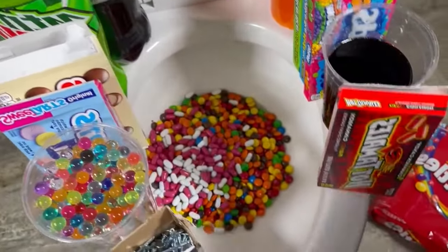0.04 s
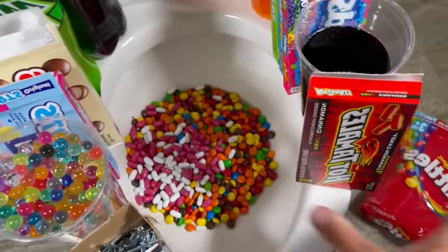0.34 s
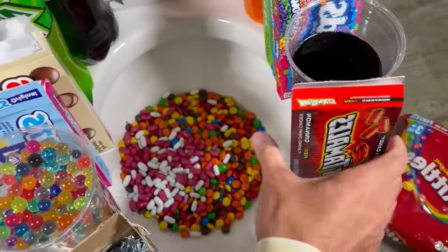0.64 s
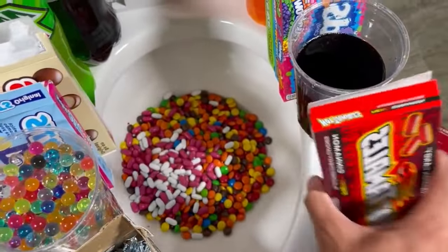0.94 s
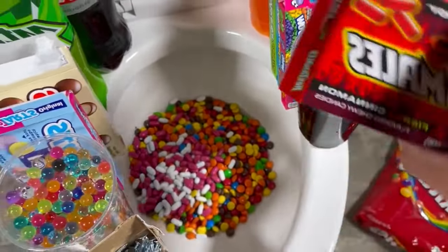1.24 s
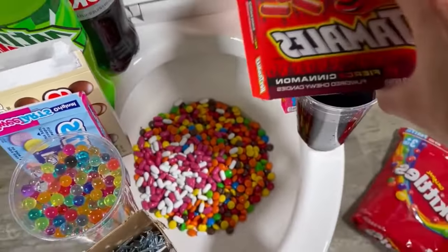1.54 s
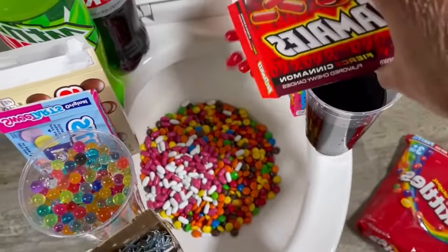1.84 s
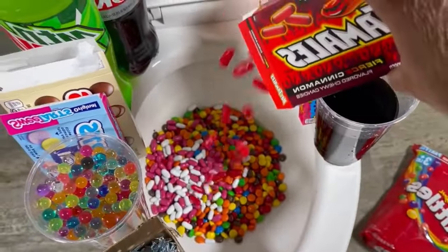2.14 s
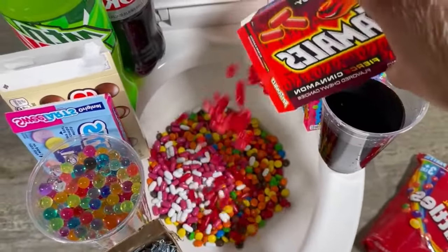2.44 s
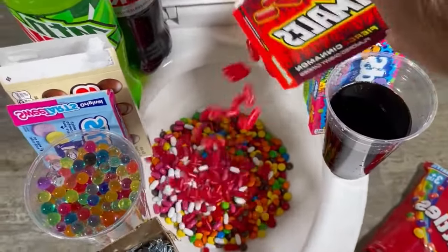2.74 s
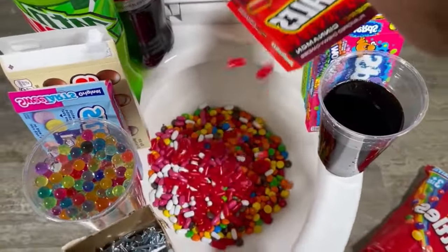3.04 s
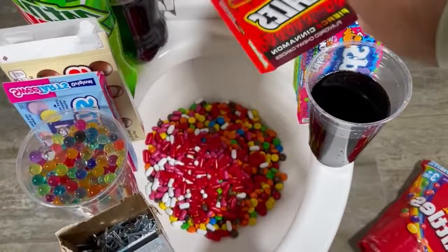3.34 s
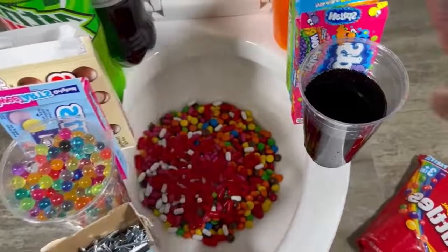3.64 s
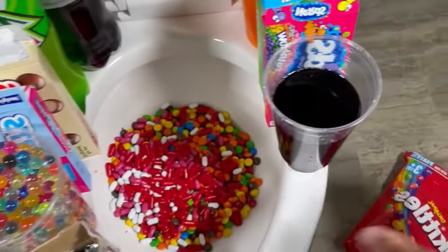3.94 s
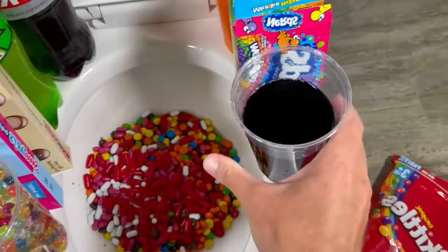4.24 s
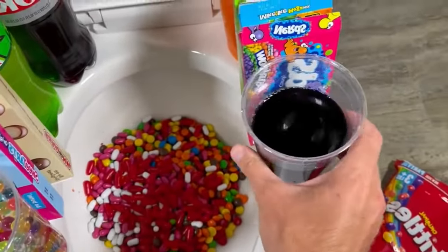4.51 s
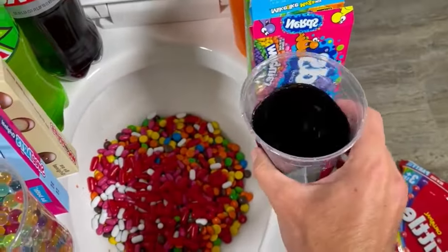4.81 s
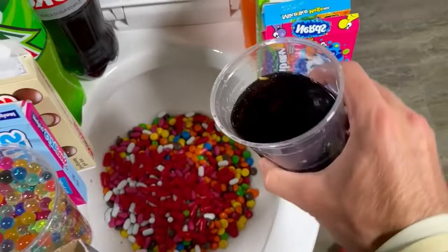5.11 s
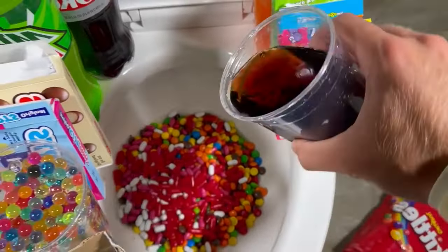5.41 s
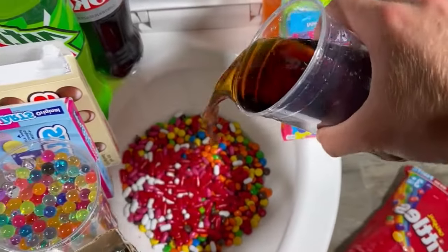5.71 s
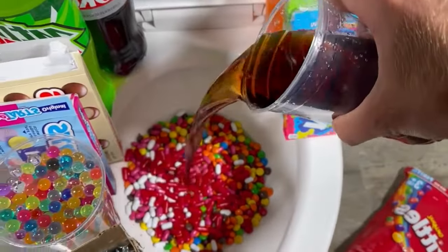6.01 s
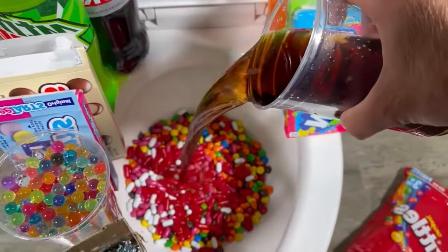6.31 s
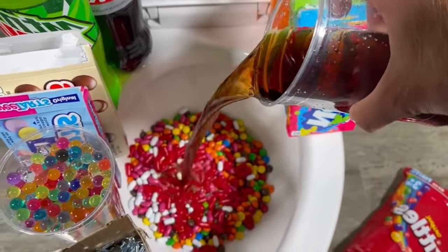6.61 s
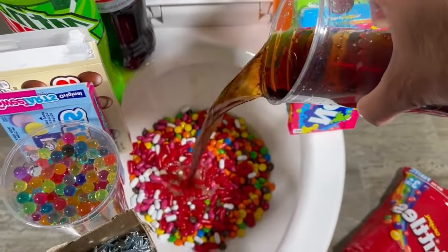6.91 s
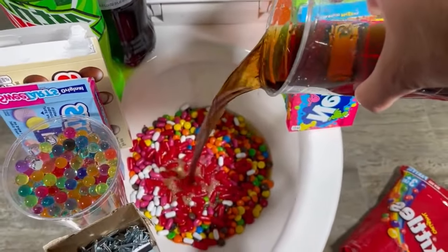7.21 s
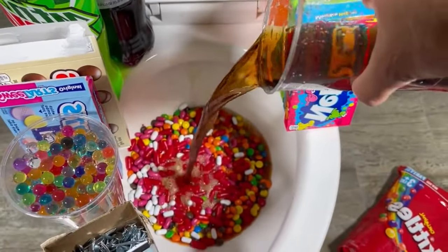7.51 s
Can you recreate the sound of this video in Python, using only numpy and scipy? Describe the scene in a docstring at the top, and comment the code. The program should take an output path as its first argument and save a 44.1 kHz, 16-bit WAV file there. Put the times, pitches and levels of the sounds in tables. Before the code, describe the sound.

Heard from close above a porcelain toilet bowl in a small tiled room, a few hollow bumps sound over a faint electric hum. Hard candies slide and rattle inside a card box and spill onto more candies with a crisp, clicking clatter. After a short lull come light knocks and crackles from a plastic cup against the rim, and finally a pour of soda that splashes and fizzes brightly on the pile.

```python
"""First come a few hollow knocks over a low hum: a hand bumps a card box of hard candies on the rim of
a porcelain toilet. The box tips, and the candies rattle down the card, then clatter onto a pile of
candies in the bowl, each with a tiny snap. A plastic cup bumps the rim, and soda splashes on the pile
and fizzes with tiny ringing bubbles. A small tiled room echoes; the microphone is close above the bowl."""
import sys
import numpy as np
from scipy import signal
from scipy.fft import rfft, irfft, next_fast_len
from scipy.io import wavfile
from scipy.ndimage import uniform_filter1d, map_coordinates

SR = 44100
rng = np.random.default_rng(int(sys.argv[2]) if len(sys.argv) > 2 else 0)


def int16_out(signal):
    """Quantize to a 16-bit WAV file."""
    q = np.round(np.clip(np.atleast_2d(signal).T, -1, 1) * 32767)
    wavfile.write(sys.argv[1], SR, q.astype(np.int16))


N = 337806


def amp(db):
    """Turn decibels into a number to multiply a sound by."""
    return 10 ** (np.asarray(db) / 20)


def unit(x):
    """Scale a sound to an average strength (rms) of 1."""
    return x / np.sqrt(np.mean(x ** 2) + 1e-20)


def along(points, hz):
    """Read between the (f/Hz, value) rows of a table, on a musical pitch scale."""
    f, v = np.transpose(points)
    return np.interp(np.log(hz + 1), np.log(f + 1), v)


def level(rows):
    """Join (t/s, level/dB) rows into a volume curve, silent before and after."""
    rows = np.asarray(rows)
    return amp(np.interp(np.arange(N) / SR, rows[:, 0], rows[:, 1], left=-150, right=-150))


def swell(s, length, rise_s, fall_s):
    """A volume curve that rises at time s, holds, then dies away."""
    t = np.maximum(np.arange(N) / SR - s, 0)
    return (1 - np.exp(-t / rise_s)) * np.exp(-np.maximum(t - length, 0) / fall_s)


def wobble(rate):
    """A smooth curve through `rate` random values a second."""
    return map_coordinates(rng.standard_normal(int(N * rate / SR) + 4), [np.arange(N) * rate / SR])


def add(track, s, sound):
    """Mix a stereo sound in at time s."""
    start = int(s * SR)
    track[:, start:start + sound.shape[-1]] += sound[..., :N - start]


def sides(db):
    """Two volumes that make the left side db louder than the right."""
    return amp(np.array([[db], [-db]]) / 2)


def noise(size, spread):
    """Stereo noise; more spread sounds wider."""
    mid, side = rng.standard_normal((2, size))
    return unit(np.array([mid + spread * side, mid - spread * side]))


def ticks(rows, t60):
    """A burst of noise for each (t/s, level/dB) row; t60 is the seconds it takes to fade by 60 dB."""
    track, t = np.zeros((2, N)), np.arange(SR // 20) / SR
    for s, db in rows:
        add(track, s, noise(len(t), spread=0.46) * amp(db - 60 * t / t60))
    return track


def grains(rate, low_hz, high_hz, cycles, size_db, rise=0):
    """Tiny fading pings, `rate` a second; size_db makes them uneven and rise bends their pitch up."""
    count = int(rate * N / SR)
    when, pitch, size, pan, lag = rng.random((5, count, 1))
    hz = low_hz + (high_hz - low_hz) * pitch
    i = np.arange(min(int(4 * cycles * SR / low_hz), 2000))
    age = hz * i / SR / cycles
    shape = amp(-size_db * np.log(size + .01)) * np.exp(-age)
    phase = 2 * np.pi * cycles * age * (1 + rise * np.minimum(age, 2) / 2)
    where = ((when * N).astype(int) + i).ravel()
    ears = [shape * (1 + way * (pan - .5)) * np.sin(phase + way * (lag - .5)) for way in (1, -1)]
    return unit(np.array([np.bincount(where, ear.ravel(), N)[:N] for ear in ears]))


def colour(x, tone):
    """Shape a sound with an (f/Hz, level/dB) tone table; plain white noise keeps its overall power."""
    size = 16384
    cepstrum = irfft(np.log(amp(along(tone, np.fft.rfftfreq(size, 1 / SR)))))
    cepstrum[1:size // 2] *= 2  # folded so the filter rings only after a hit, never before
    cepstrum[size // 2 + 1:] = 0
    pulse = irfft(np.exp(rfft(cepstrum)))
    return signal.fftconvolve(x, pulse[None] / np.linalg.norm(pulse), axes=1)[:, :N]


def patchy(x, depth_db):
    """Pitches grow louder and softer at random, as when the pile shifts."""
    z = signal.stft(x, nperseg=512)[2]
    patches = uniform_filter1d(rng.standard_normal(z.shape[1:]), size=7, axis=0)
    patches = uniform_filter1d(patches, size=16, axis=1)
    return unit(signal.istft(z * amp(depth_db * unit(patches)), nperseg=512)[1][:, :N])


def glide(x, path, sharpness):
    """Bring out one moving pitch that follows (t/s, f/Hz) rows."""
    hz, t, z = signal.stft(x, SR, nperseg=1024)
    ratio = (hz[:, None] + 1) / np.interp(t, *np.transpose(path))
    gain = 1 / (1 + 1j * sharpness * (ratio - 1 / ratio)) ** 2
    return unit(signal.istft(z * gain, SR, nperseg=1024)[1][:, :N])


# Levels in the tables are relative: the code that plays them sets the final volume.
HUM_NOTES = [(59.6, -66), (119, -78.5), (238, -78)]  # the notes of the electric hum: f/Hz, level/dB
RUMBLE_TONE = [(20, -31.5), (32, -22), (43, 0.5), (62, 7.5), (85, -7.5), (150, -7.5), (300, -19),
               (600, -26), (1500, -42), (3000, -66.5)]  # the deep tone of the rumble: f/Hz, level/dB
RUMBLE_LEVEL = [(0.0, -60), (4.3, -57), (6.8, -56), (7.27, -50.5), (7.66, -47.5)]  # the rumble slowly growing: t/s, level/dB
HISS_TONE = [(300, 2.5), (1500, -1), (3000, -1), (6000, -9), (9000, -3.5), (11200, 2), (13000, -19)]  # the tone of the faint hiss: f/Hz, level/dB
def background():
    """Mains electricity hums over a low rumble and a faint hiss."""
    t = np.arange(N) / SR
    hum = sum(amp(db) * np.sqrt(2) * np.sin(2 * np.pi * hz * t + .25 * wobble(1)) for hz, db in HUM_NOTES)
    rumble = colour(noise(N, spread=0.57), RUMBLE_TONE) * level(RUMBLE_LEVEL) * amp(1)
    hiss = colour(noise(N, spread=0.74), HISS_TONE) * amp(-84)
    return hum + rumble + hiss


ROOM_FADE = [(100, 0.45), (400, 0.39), (1200, 0.49), (4000, 0.61), (9000, 0.55), (14000, 0.28)]  # how long the tiles echo at each pitch: f/Hz, t60/s
def room(x, echo_db):
    """Add the tiled room's echo, made afresh three times a second because the sources move."""
    out, block = x.copy(), SR // 3
    for start in range(0, N, block):
        part = x[:, start:start + block].mean(axis=0)
        if np.abs(part).max() > 1e-5:
            hz, t, z = signal.stft(noise(SR // 2, spread=0.65), SR, nperseg=256)
            fade = amp(-60 * t / along(ROOM_FADE, hz)[:, None]) * (1 - np.exp(-t / 0.002))
            tail = signal.istft(z * fade, SR, nperseg=256)[1]
            echo = signal.fftconvolve(part[None], tail / np.linalg.norm(tail[0]), axes=1)
            add(out, start / SR, amp(echo_db) * echo)
    return out


CARD_TONE = [(150, -16), (500, -6), (800, 2.5), (1250, 1), (1600, -1), (2200, 1), (3000, -5), (4200, -10),
             (6500, -12.5), (8500, -7), (11200, -10.5), (12500, -42), (14000, -59)]  # the tone of tapped card: f/Hz, level/dB
BOX_AIR_PITCH = [(1.401, 570), (1.648, 537), (1.851, 470), (2.1, 350), (2.5, 237), (3.0, 223)]  # the air in the box, deeper as it empties: t/s, f/Hz
BRUSH_TONE = [(100, -18), (300, 0), (800, -9), (2000, -1.5), (4000, -8.5), (6500, -8.5), (8500, -4.5),
              (11200, 0), (13000, -35.5)]  # the tone of a hand rubbing card: f/Hz, level/dB
SLIDE_LEVEL = [(1.05, -73.5), (1.3, -58.5), (1.45, -42), (1.72, -37.5), (1.96, -43.5), (2.55, -34),
               (3.0, -48), (3.25, -70), (3.7, -70)]  # candies sliding down the card: t/s, level/dB
HAND_STROKES = [(0.0, 0.011, -73), (0.086, .07, -78), (3.688, 0.16, -63.5), (3.8, 0.055, -61),
                (3.901, .16, -59.5), (5.565, .05, -82)]  # the hand brushing the box: t/s, length/s, level/dB
BOX_TAPS = [(1.179, -44.5, -57), (1.306, -42.5, -54), (1.415, -27.5, -50.5), (1.435, -23.5, -29),
            (1.461, -22.5, -48), (1.5, -23, -45), (1.572, -28, -32.5), (1.641, -23.5, -39.5),
            (1.679, -22, -35), (1.734, -22, -53.5), (1.814, -30.5, -28), (1.849, -26.5, -30),
            (2.034, -21, -41.5), (2.081, -25.5, -36.5), (3.808, -48.5, -59.5), (4.062, -46.5, -65)]  # single taps on the box: t/s, card level/dB, air level/dB
def box():
    """Candies tumble against the card and sound the air inside; the hand brushes it before and after."""
    tumbling = grains(rate=1000, low_hz=547, high_hz=11330, cycles=0.82, size_db=2.5)
    tumbling += 2.5 * noise(N, spread=0.59)
    rattle = patchy(colour(tumbling, CARD_TONE), depth_db=1.2) * amp(2.4 * wobble(60))
    low_taps = grains(rate=700, low_hz=222, high_hz=1264, cycles=1, size_db=3.5)
    hollow = glide(low_taps, BOX_AIR_PITCH, sharpness=0.76)
    sliding = (rattle * amp(-0.5) + hollow * amp(-8.5)) * level(SLIDE_LEVEL)
    brush = patchy(colour(noise(N, spread=0.54), BRUSH_TONE), depth_db=5) * amp(3.7 * wobble(45))
    strokes = sum(amp(db) * swell(s, length, rise_s=.005, fall_s=.025) for s, length, db in HAND_STROKES)
    taps = np.array(BOX_TAPS)
    card_taps = colour(ticks(taps[:, [0, 1]], t60=0.04), CARD_TONE) * amp(-7)
    air_taps = glide(ticks(taps[:, [0, 2]], t60=0.06), BOX_AIR_PITCH, sharpness=1.2) * amp(-57)
    return room(sliding + card_taps + air_taps + brush * strokes, echo_db=-7) * sides(2.6)


def ring(notes, centre_hz, t, db_per_octave, attack_s):
    """A struck thing rings at its own notes; where it is hit favours those near centre_hz."""
    hz, db, t60 = np.transpose(notes)[:, :, None]
    db = db - db_per_octave * np.abs(np.log2(hz / centre_hz))
    strength, skew = rng.standard_normal((2, len(notes), 1))
    phase = 2 * np.pi * (hz * t + rng.random((len(notes), 1)))
    fade = amp(db + 2 * strength - 60 * t / t60) * (1 - np.exp(-t / attack_s))
    pair = np.array([np.sum(fade * np.sin(phase + way * 0.74 * skew), axis=0) for way in (1, -1)])
    return pair / np.abs(pair).max()


# The box, then the cup, bumping the rim; the last three levels are added to the first:
# t/s, level/dB, ring f/Hz, thump level/dB, thump f/Hz, crack level/dB, second touch level/dB
RIM_BUMPS = [(0.149, -55.5, 910, 1, 240, -17, -3), (0.429, -19, 1700, -31.5, 284, -16.5, -7.5),
             (0.441, -14, 853, -19, 148, -17.5, -5.5), (0.692, -7, 900, -32.5, 210.4, -26.5, -4.5),
             (0.823, -17.5, 1060, -30, 253, -26, -6), (4.14, -26, 778, -21, 234, -13.5, -11.5),
             (4.152, -11.5, 800, -25, 220, -16.5, -4), (4.171, -25, 787, -7.5, 105, -13, -7),
             (4.234, -24, 786, -19, 217, -17, -20), (4.32, -27.5, 780, -7.5, 278, -14.5, -5.5),
             (4.404, -30, 856, -5, 215, -24, -16), (4.588, -47.5, 732, -3, 215, -16.5, -7),
             (4.686, -12, 1300, -30.5, 299, -21, -13.5), (4.821, -35, 417, -10.5, 218, -23, -12),
             (4.922, -27.5, 909, -30.5, 261, -20, -0.5), (4.946, -13.5, 925, -23, 206, -23.5, -6)]
def rim_touches(rock_s=.013):
    """Every bump is a first touch and a duller second one as the box or cup rocks."""
    for s, db, ring_hz, thump_db, thump_hz, crack_db, again_db in RIM_BUMPS:
        yield s, db, ring_hz, thump_db, thump_hz, crack_db
        yield s + rock_s, db + again_db, ring_hz * .71, thump_db, thump_hz * .62, crack_db


BOWL_NOTES = [(416, -5, 0.051), (577, -6, 0.048), (724.6, -5, 0.068), (773, 1.5, 0.03), (856, -2, 0.044),
              (945, -10.5, 0.042), (1102, -6.5, 0.053), (1159, -14, 0.1), (1222, -0.5, 0.019),
              (1360, -4, 0.027), (1473, -5, 0.06), (1618, -6, 0.042), (1947, -10.5, .06)]  # the notes of the hollow bowl and its rim: f/Hz, level/dB, t60/s
SEAT_NOTES = [(60, -14, .2), (108, -9.5, 0.2), (132, -5, 0.17), (192.3, -6, 0.17), (227, -1.5, 0.082),
              (270, 0, 0.1)]  # the low notes of the seat: f/Hz, level/dB, t60/s
CRACK_TONE = [(100, -27), (700, 7), (1900, 1.5), (3000, -5), (6000, -12.5), (8600, -10), (11000, -6),
              (12500, -29), (14500, -44.5)]  # the tone of the box or cup crackling: f/Hz, level/dB
def knocks():
    """Each soft bump rings the bowl, thumps the seat and crackles like card or thin plastic."""
    body, cracks, t = np.zeros((2, N)), np.zeros((2, N)), np.arange(SR // 4) / SR
    soft_start = 1 - np.exp(-(t / .002) ** 2)
    for s, db, ring_hz, thump_db, thump_hz, crack_db in rim_touches():
        bowl = ring(BOWL_NOTES, ring_hz, t, db_per_octave=13, attack_s=.0005) * soft_start
        seat = ring(SEAT_NOTES, thump_hz, t, db_per_octave=10.5, attack_s=.00076)
        add(body, s, amp(db) * sides(2.4) * bowl + amp(db + thump_db + 6) * seat)
        burst = noise(len(t), spread=0.49) * amp(-60 * t / 0.058) * soft_start
        add(cracks, s, amp(db + crack_db + 9.5) * sides(1.8) * burst)
    return room(body + colour(cracks, CRACK_TONE), echo_db=-3.5) * sides(1.5)


POUR_SURGES = [(6.07, 3), (6.3, 3.5), (6.5, 3), (6.65, -4.5), (6.74, 4), (6.88, 3.5), (7.12, 2), (7.38, 3),
               (7.5, 0), (7.63, 1.5)]  # the stream swelling and easing as the cup tips: t/s, level/dB
def stream(start_s=5.882, rise_s=.0034, surge_s=.032, soaked_s=6.42, soaking_s=.051):
    """Volume curves for fizz, froth and splash: the flow starts at once, surges and soaks the pile."""
    t = np.arange(N) / SR
    flowing = 1 - np.exp(-np.maximum(t - start_s, 0) / rise_s)
    surge_db = sum(db * np.exp(-.5 * ((t - s) / surge_s) ** 2) for s, db in POUR_SURGES)
    soaked = .5 + .5 * np.tanh((t - soaked_s) / (2 * soaking_s))
    froth_db = -47.5 - 8 * soaked  # the bubbles fade as the pile soaks
    return flowing * amp([-41 + surge_db, froth_db + 0.44 * surge_db, -58 + 0.89 * surge_db])


FIZZ_TONE = [(800, -44), (2200, -20.5), (4600, -12), (6200, -7), (7600, -1), (9200, 0.5), (11000, 6),
             (12200, -4.5), (13500, -15.5), (15500, -50)]  # the bright tone of the fizz: f/Hz, level/dB
FROTH_TONE = [(1000, 2.5), (2200, -17.5), (2900, -0.5), (3500, 3.5), (4400, -5.5), (7000, -23),
              (12000, -41)]  # the tone of bubbles between the candies: f/Hz, level/dB
SPLASH_TONE = [(70, 7), (160, -16.5), (270, 9), (420, -15.5), (580, -4), (900, -4.5), (1200, -4),
               (2200, -3), (4000, -3.5), (8000, -47)]  # the duller tone of the splash: f/Hz, level/dB
FIRST_SPLASH = [(5.883, -64, 2455), (5.91, -56, 2280), (5.98, -54.5, 1570), (6.06, -54.5, 1200),
                (6.2, -79, 1060)]  # the first splash spreading: t/s, level/dB, f/Hz
BIG_DROPS = [(6.0911, -27), (6.2198, -26.5), (6.7595, -26), (6.9656, -23.5), (7.0509, -23.5),
             (7.1292, -19.5)]  # larger drops snapping on the pile: t/s, level/dB
POOL_LEVEL = [(6.0, -73), (7.2, -75), (7.5, -51.5), (7.66, -57)]  # soda gurgling as it pools: t/s, level/dB
def soda():
    """Soda lands with a splash that falls in pitch, then fizzes; bubbles chirp and a pool gurgles."""
    spatter = grains(rate=1500, low_hz=2420, high_hz=14360, cycles=4.1, size_db=-4.5)
    chirps = grains(rate=220, low_hz=3500, high_hz=10000, cycles=16, size_db=2, rise=.07)
    fizz = colour(spatter + .6 * chirps + .3 * noise(N, spread=.5), FIZZ_TONE)
    fizz = patchy(fizz, depth_db=1.8) * amp(1.1 * wobble(25))
    bubbles = grains(rate=1600, low_hz=2595, high_hz=6320, cycles=10.4, size_db=0.9, rise=0.083)
    froth = patchy(colour(bubbles, FROTH_TONE), depth_db=0.3)
    drops = grains(rate=500, low_hz=903, high_hz=2630, cycles=2.9, size_db=5.5, rise=0.135)
    splash = colour(.3 * drops + noise(N, spread=.5), SPLASH_TONE)
    splash = patchy(splash, depth_db=1.6) * amp(1.6 * wobble(14))
    gurgle = grains(rate=200, low_hz=463, high_hz=657, cycles=8.4, size_db=4, rise=0.036)
    first = glide(drops + noise(N, spread=.5), np.array(FIRST_SPLASH)[:, ::2], sharpness=1.65)
    snaps = colour(ticks(BIG_DROPS, t60=0.024), FIZZ_TONE) * amp(-2.5)
    fizz_volume, froth_volume, splash_volume = stream()
    bright = fizz * fizz_volume + froth * froth_volume + snaps
    dull = splash * splash_volume + gurgle * level(POOL_LEVEL) * amp(-6) + first * level(FIRST_SPLASH)
    return room(bright + dull * sides(1.7), echo_db=-5.5) * sides(1.4)


def bowl_echoes(x, t60, echo_db):
    """Add many quick echoes off the curved porcelain."""
    t = np.arange(SR // 16) / SR
    echoes = noise(len(t), spread=0.18) * amp(-60 * t / t60)
    return x + amp(echo_db) * signal.fftconvolve(x, echoes / np.linalg.norm(echoes[0]), axes=1)[:, :N]


FIRST_CANDIES = [(1.8723, -11.5), (1.9026, -22.5), (1.9174, -16), (2.0067, -19.5), (2.1272, -5.5),
                 (2.1779, -8), (2.189, -8), (2.2504, -11.5), (2.264, -13), (2.2944, -9.5), (2.3306, -7),
                 (2.383, -5.5), (2.4256, -7), (2.46, -14.5), (2.5149, -12.5), (2.5295, -6.5),
                 (2.5624, -6.5), (2.587, -11.5), (2.6139, -7.5), (2.6261, -8.5), (2.6733, -8.5),
                 (2.7167, -16), (2.7669, -8.5), (2.7995, -8.5), (2.847, -5.5), (2.9011, -13), (2.9333, -11),
                 (2.9746, -12.5), (3.0125, -13), (3.0597, -10), (3.1164, -11), (3.1879, -11), (3.2621, -8),
                 (3.3229, -10), (3.469, -26.5), (3.487, -29)]  # the first candy of each clump landing: t/s, level/dB
CANDY_FLOW = [(2.12, -44), (2.35, -26), (2.49, -33), (2.62, -23.5), (2.74, -24.5), (2.92, -24.5),
              (3.1, -35), (3.3, -55), (3.551, -75)]  # the flow of candies from the box: t/s, level/dB
def landings(followers, clump_s=.036, bounce_s=.007):
    """List (t/s, level/dB) for each clump: its first candy, one softer bounce and the followers."""
    s, db = np.transpose(FIRST_CANDIES)
    chance = rng.random((len(s), followers + 1))
    lateness = (np.arange(followers) + chance[:, 1:]) / followers
    follow_s = s[:, None] + clump_s * lateness
    follow_db = np.interp(follow_s, *np.transpose(CANDY_FLOW)) + 6.5 * (1 - lateness)  # later is softer
    follow_db += 4.5 * rng.standard_normal(lateness.shape)  # candies differ in size
    again_s = s + bounce_s * (.5 + chance[:, 0])
    first_db = db - 7
    return [*zip(follow_s.ravel(), follow_db.ravel()), *zip(s, first_db), *zip(again_s, first_db - 12)]


CLICK_TONE = [(80, -50.5), (150, -30.5), (260, -40.5), (400, -27), (600, -38), (770, -23.5), (1100, -35.5),
              (1900, -21.5), (3300, -12), (5000, -12), (7000, -7.5), (9000, -2), (10700, 6.5),
              (12000, -5.5), (13500, -17), (15500, -32.5)]  # the bright tone of a candy landing: f/Hz, level/dB
BOOM_TONE = [(80, -10), (150, -7.5), (255, 3), (380, -20.5), (620, -7), (750, 6), (850, -14), (1100, -11),
             (2500, -48.5)]  # the tone of the bowl under the pile: f/Hz, level/dB
def candies():
    """Each candy lands with a snap and its shell rings; others roll and settle, and the bowl booms."""
    hits, t = np.zeros((2, N)), np.arange(SR // 20) / SR
    sharp_start = 1 - np.exp(-t / 0.00059)
    for s, db in landings(followers=4):
        pitch, pan = rng.standard_normal(2)
        snap = noise(len(t), spread=0.16) * amp(-60 * t / 0.016)
        shell = .7 * np.sin(2 * np.pi * 8800 * np.exp(.15 * pitch) * t) * amp(-60 * t / .006)
        echoes = 0.5 * noise(len(t), spread=0.25) * amp(-60 * t / 0.043)
        add(hits, s, amp(db + 5) * sides(1.2 + 2 * pan) * (snap + shell + echoes) * sharp_start)
    settling = grains(rate=800, low_hz=1140, high_hz=13100, cycles=0.56, size_db=4)
    clatter = hits + unit(bowl_echoes(settling, t60=0.27, echo_db=4)) * level(CANDY_FLOW) * amp(-1)
    boom = colour(clatter, BOOM_TONE) * amp(-28.5) * sides(2)
    return room(colour(clatter, CLICK_TONE) + boom, echo_db=-10.5)


def scene():
    """Add up everything around the bowl."""
    return knocks() + candies() + box() + soda() + background()


STEREO_WIDTH = [(100, -12.5), (400, -4.5), (1300, 3), (2500, -1.5), (6500, 1.5), (7800, 0), (8800, -9.5),
                (12000, -13.5)]  # how much left and right differ at the microphone: f/Hz, level/dB
LEFT_LEAD = [(200, .05), (860, 0.91), (3000, 0.6), (6500, 0.012), (7600, .5), (8800, 0.025)]  # the left side's head start, as the sources lie a little left: f/Hz, phase/rad
def record(dry, late_above_hz=8500, lag_s=.00029, top_hz=16500):
    """The microphone's left side leads a little; in the high treble both are alike, the left one late."""
    size = next_fast_len(N + SR // 4)
    hz = np.fft.rfftfreq(size, 1 / SR)
    left, right = rfft(dry, size)
    mid = (left + right) / 2
    side = (left - right) / 2 * amp(along(STEREO_WIDTH, hz))
    shift = np.exp(1j * (np.pi * lag_s * np.maximum(hz - late_above_hz, 0) - along(LEFT_LEAD, hz) / 2))
    pair = np.array([(mid + side) / shift, (mid - side) * shift])
    return irfft(pair * (hz < top_hz), size)[:, :N]


dry = scene()
out = record(dry)
int16_out(out)
```